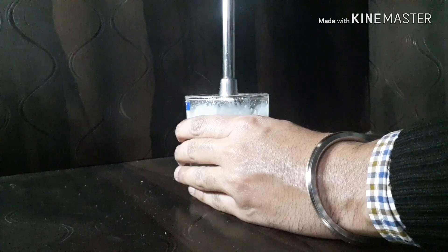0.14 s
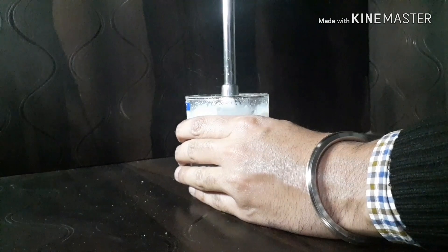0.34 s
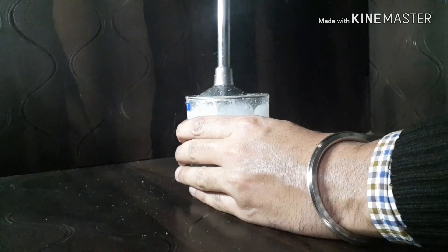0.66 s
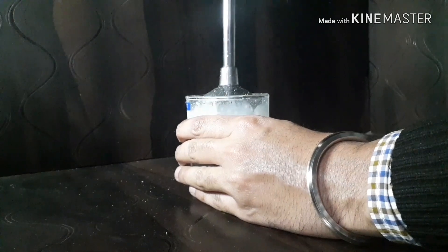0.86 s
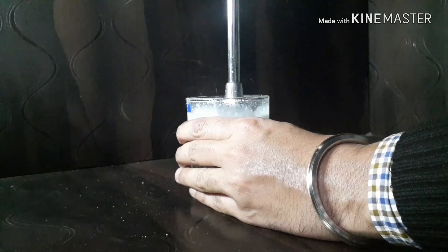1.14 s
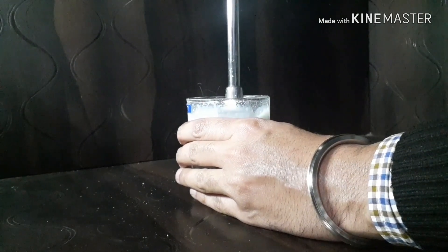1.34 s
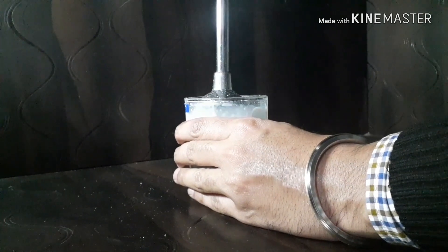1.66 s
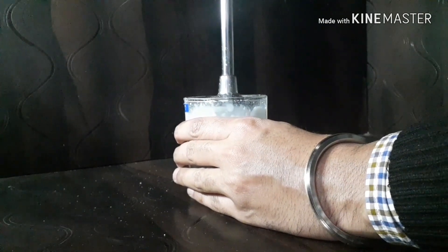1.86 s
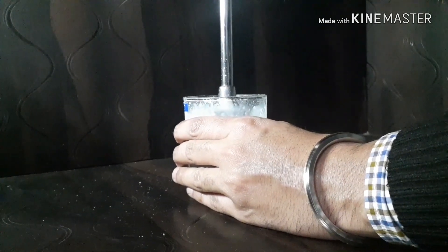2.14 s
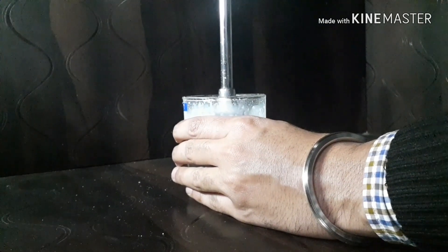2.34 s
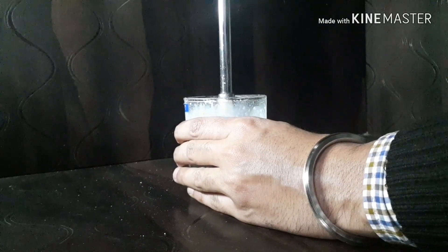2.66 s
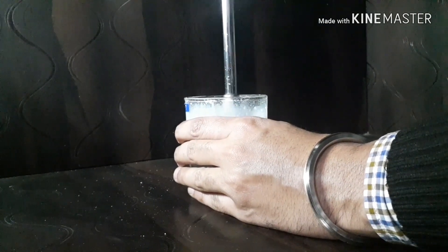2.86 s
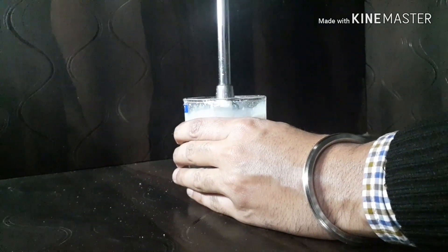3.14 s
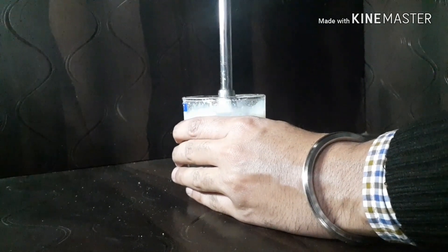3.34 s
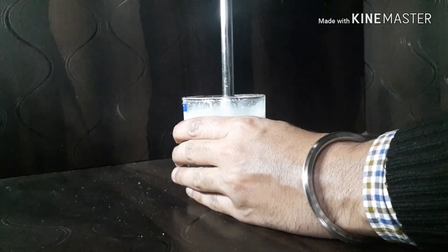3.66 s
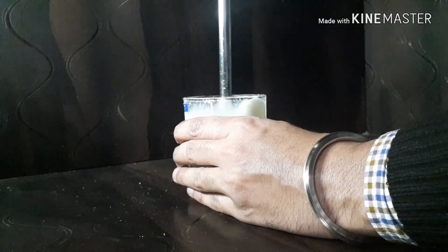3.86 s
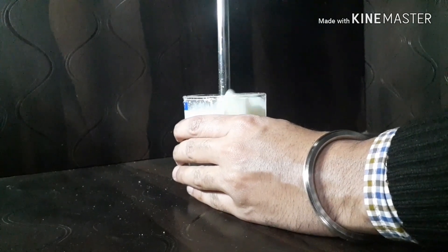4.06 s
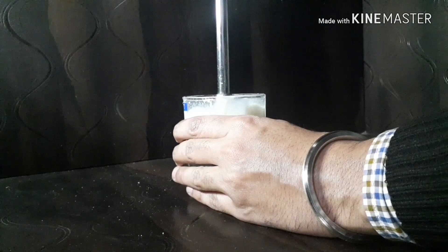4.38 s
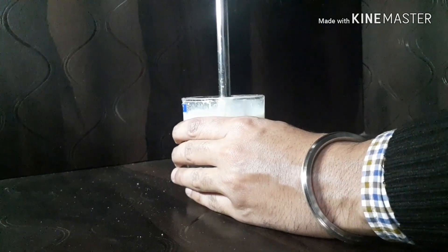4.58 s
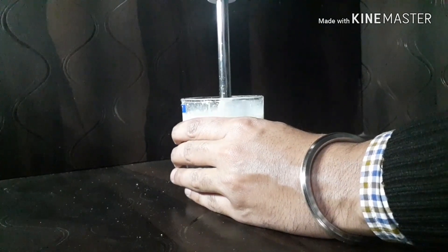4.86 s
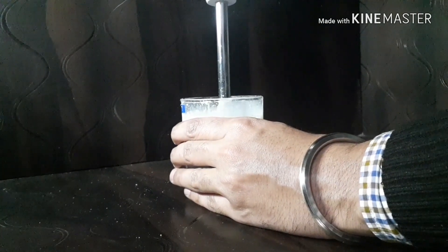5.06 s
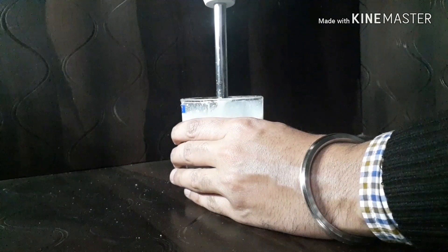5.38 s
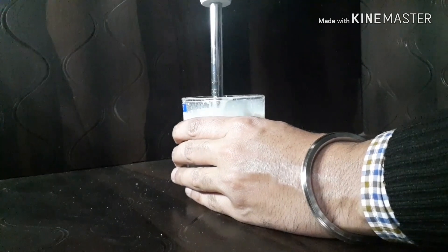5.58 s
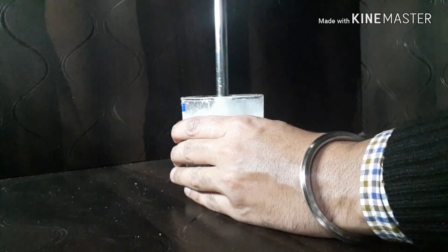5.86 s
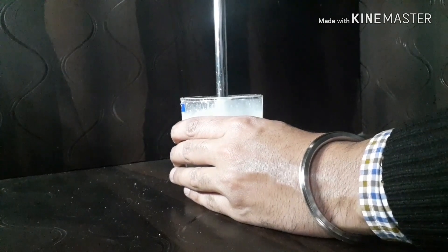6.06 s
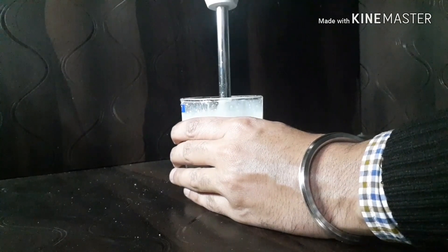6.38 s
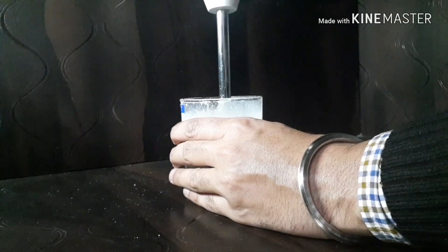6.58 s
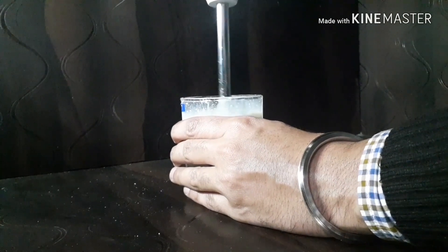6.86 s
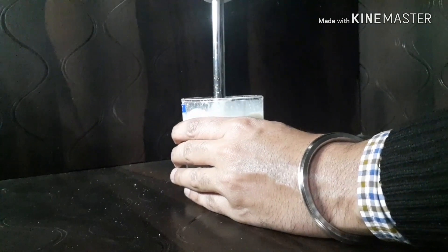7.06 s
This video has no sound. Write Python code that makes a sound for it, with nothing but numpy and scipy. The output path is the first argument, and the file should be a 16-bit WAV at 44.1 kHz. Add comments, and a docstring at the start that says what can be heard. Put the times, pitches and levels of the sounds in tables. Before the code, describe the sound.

Close in a small kitchen, an electric hand blender revs twice in a glass, each spin rising to a bright buzzing whine and sagging down within a second. Fine fizzy hiss runs underneath, and the metal foot clinks the glass. Four short plunges into liquid follow, with pauses between: low, lumpy churning, wet splash, table rattle and thin high whines. The hiss slowly fades; the last plunge is still running at the end.

```python
"""Hand blender in a glass

A hand blender works in a glass on a kitchen table. In two spins near the surface the motor runs fast and sings;
in four plunges into the liquid it labours, and the churning thumps through glass and table.
Tones that follow the shaft, short whines and filtered noise make the motor; uneven noise makes the churning.
A bright hiss, perhaps fizzing froth, never stops; the metal foot now and then knocks the glass (ringing tones)."""
import sys
import numpy as np
from scipy import signal
from scipy.fft import rfft, irfft, next_fast_len
from scipy.io import wavfile
from scipy.ndimage import uniform_filter1d, minimum_filter1d

SR = 44100
rng = np.random.default_rng(int(sys.argv[2]) if len(sys.argv) > 2 else 0)


def store_pcm(level_fs):
    """Save levels as 16-bit WAV."""
    pcm = np.round(np.clip(level_fs, -1, 1) * 32767).astype(np.int16)
    wavfile.write(sys.argv[1], SR, np.atleast_2d(pcm).T)


N = 318402  # length in samples

# Levels in colour, ring and shaft tables are relative: their sums are scaled later.

# Hiss over time: time_s, level_db, treble_change_db (for the part above about 10.5 kHz)
HISS_PATH = [(0.0, -28.5, -2), (0.14, -26, -1), (0.5, -25, 0.5), (0.8, -28, -4), (1.01, -25, 3.5),
             (1.37, -25.5, -3), (1.85, -30, -1), (2.83, -31.5, 3.5), (2.97, -26, 2), (3.2, -30.5, -4),
             (3.46, -34, 4), (3.65, -32, 7.5), (3.95, -32, -5), (4.22, -33, -1), (4.83, -35.5, -14),
             (5.27, -34, -7), (5.59, -32.5, -6), (5.87, -37.5, -10), (6.15, -38, -22), (6.4, -37.5, -12),
             (6.7, -39, -4), (7.22, -49, -8)]
# Colour of the hiss: pitch_hz, level_db (per Hz)
HISS_COLOUR = [(24, -79), (40, -32), (215, -11.5), (269, -15), (529, -22), (570, -14.5), (810, -5),
               (896, 1), (1040, -1), (2630, -5), (3740, 1.5), (6170, 3.5), (10400, 2), (14800, -8),
               (16000, 8)]
# Narrow bands that stand out of the hiss: pitch_hz, width_hz, level_db
HISS_BANDS = [(705, 107, -19.5), (5730, 130, -19.5), (7980, 210, -19.5)]
# Foot against glass: start_s, clink_db, knock_db, knock_pitch_hz, thud_db
KNOCKS = [(1.144, -7.5, -15, 3440, -24.5), (1.197, -9, -18, 5440, -41), (1.239, -10, -16, 5340, -28.5),
          (1.386, -5.5, -29, 2337, -27), (1.702, -34, -28, 955, -30), (2.796, -24, -10.5, 1000, -22),
          (2.89, -9, -26, 3270, -16), (3.999, -30, -18, 2030, -14), (4.063, -30, -16, 2030, -27),
          (4.167, -27, -12.5, 1913, -22), (4.294, -15, -28, 1660, -8.5), (4.308, -9, -14.5, 3930, -15),
          (5.708, -22, -4.5, 1200, -7), (6.29, -55, -27, 813, -29), (6.576, -28, -27, 905, -40),
          (6.924, -24, -8, 940, -27)]
# Ringing tones of the glass: pitch_hz, level_db, time_to_fall_60_db_s
GLASS_RINGS = [(2060, 3, 0.0062), (3220, -24, 0.014), (4370, -1.5, 0.014), (5420, -7, .02),
               (6000, -8.5, 0.027), (7200, -14, 0.011)]
# Ringing of glass and table: pitch_hz, width_hz, level_db
TABLE_RINGS = [(98.2, 5.2, -18.5), (142.3, 14, -12), (172.6, 14, -41), (233.3, 8.5, -13.5),
               (315.6, 10, -12), (347.5, 10, -8), (417.5, 11.5, -14.5), (594, 23, -16), (670, 7.4, -22),
               (888, 12, -17), (940, 40, -30), (1283, 29, -27)]
# Motor whine, one row a start: start_s, length_s, first_pitch_hz, final_pitch_hz (both before the sag),
# climb_s, peak_db, held_db (both before the fades), fuzz_0_to_1
WHINES = [(0.077, 0.084, 2850, 3600, .05, -29, -32, 0.6), (.965, 0.083, 2550, 3870, 0.058, -29.5, -28, 0.3),
          (2.829, 0.23, 3000, 3370, .04, -21, -31, 0.9), (3.805, 0.53, 2750, 3360, 0.024, -25, -37, 0.75),
          (5.256, 0.513, 2817, 3370, .05, -30.5, -36, 0), (6.647, .62, 2995, 3370, 0.051, -30, -37, 0.4)]
# Laden shaft heard through the churn, one table for each of three plunges:
# time_s, turns_hz, tone_db, octave_db
LADEN_SHAFT = [
    [(2.84, 155.3, -35, -38), (2.92, 166.1, -20.5, -36), (2.975, 177.6, -13.5, -21), (3.05, 168, -35, -16)],
    [(3.82, 155.9, -38, -29), (3.91, 178.3, -16.5, -23.5), (4.0, 179.7, -20, -14.5),
     (4.06, 171.6, -8.5, -26), (4.12, 168.8, -28, -19), (4.25, 172.3, -46, -13), (4.33, 157.9, -9, -34),
     (4.36, 153, -22, -34)],
    [(6.62, 139, -26, -39), (6.68, 153.6, -17, -21), (6.73, 163, -39, -19), (6.79, 165.4, -15, -26),
     (6.9, 165.8, -29, -16), (6.98, 164.4, -36, -28), (7.08, 166.7, -27, -11.5), (7.22, 165, -9, -26)],
]
# One table a plunge: time_s, churn_db, spray_db
PLUNGES = [
    [(2.765, -50, -44), (2.78, -25.5, -34), (2.82, -20.5, -29), (2.882, -18.5, -23.5), (2.93, -15.5, -24),
     (2.948, -22, -30), (2.97, -14.5, -16.5), (3.158, -35, -39.5), (3.3, -45.5, -51), (3.55, -61, -48)],
    [(3.74, -47, -47), (3.77, -24.5, -33.5), (4.05, -17.5, -28), (4.164, -18.5, -29), (4.252, -17.5, -31),
     (4.31, -14.5, -21), (4.335, -18.5, -26.5), (4.41, -26.5, -34.5), (4.46, -28, -34.5), (4.686, -45, -59),
     (4.95, -61, -48)],
    [(5.19, -47, -47), (5.208, -24, -37), (5.294, -19, -32.5), (5.428, -18.5, -30), (5.578, -11.5, -31),
     (5.594, -17, -29), (5.634, -7.5, -33), (5.695, -13, -28.5), (5.725, -6, -28), (5.775, -15.5, -39),
     (5.892, -35.5, -50), (6.2, -51, -56)],
    [(6.56, -55, -51), (6.582, -36.5, -43), (6.628, -25, -34), (6.672, -19.5, -32.5), (6.78, -18, -35),
     (6.822, -12, -32), (6.846, -18, -33), (6.89, -11, -33), (6.906, -23, -32), (6.928, -11, -35),
     (6.945, -20.5, -32), (6.99, -15, -31), (7.012, -10.5, -29), (7.22, -12.5, -30.5)],
]
# Liquid over the blade, one row a plunge: splash_offset_db (against churn, before a further 0.5 dB drop),
# splash_loss_db_per_octave (a negative loss brightens)
DEPTHS = [(-4, -3.5), (-5, -3.5), (-5.5, 2.5), (-2, 3.5)]
# Colour of the churn, the splash and the spray: pitch_hz, level_db (per Hz)
CHURN_COLOUR = [(18, -96), (30, -32), (85, -12), (167, 9.5), (204, 1.5), (338, 5.5), (425, 9.5),
                (485, -1.5), (580, 8), (630, -29), (695, -12), (1500, -58), (1950, -76), (3300, -120)]
SPLASH_COLOUR = [(410, -45), (700, -0.5), (775, -4.5), (1220, -7.5), (1400, -9.5), (1650, -14), (2470, -21),
                 (3200, -44), (4160, -58), (7040, -120)]
SPRAY_COLOUR = [(1470, -8), (2500, -12.5), (3280, -8), (4270, -15), (5870, -11.5), (7360, -22.5),
                (12900, -29.5), (16000, -29)]
# One table a spin: time_s, shaft_turns_hz, whirr_db
SPINS = [
    [(0.0, 110, -82), (0.05, 136.1, -32.5), (0.12, 163.8, -28.5), (0.2, 200.8, -28.5), (0.34, 216.6, -27.5),
     (0.54, 225.9, -26), (0.6, 220.8, -27), (0.712, 199, -27.5), (0.826, 154.3, -30.5), (0.93, 121.5, -43)],
    [(0.93, 121.2, -38), (0.965, 139.9, -29), (1.014, 164.5, -28.5), (1.1, 201.7, -26.5),
     (1.19, 219.4, -26.5), (1.396, 228.1, -24.5), (1.46, 219.6, -24.5), (1.544, 180.7, -29),
     (1.684, 113.5, -35), (1.85, 80.3, -44), (2.05, 55.9, -68)],
]
# Shaft tones: multiple_of_shaft_pitch, level_db, level_db of the line one mains throb higher in pitch
SHAFT_TONES = [(1, 0, -17.5), (2, 1.5, -52), (3, 3, -13), (4, -5.5, -22), (5, -1.5, -3.5), (6, -2.5, -26),
               (7, -10, -15), (8, -2, -8), (9, -1.5, -9), (10, -1.5, -0.5), (15, -3.5, -10)]
# Colour of the whirr and of the brush hiss: pitch_hz, level_db (per Hz)
WHIRR_COLOUR = [(35, -64), (60, 4), (162, -10), (219, -26), (278, -6), (422, 8.5), (668, 5), (815, 5),
                (1400, 8), (2490, 6.5), (7000, -20), (9100, -46), (15400, -120)]
BRUSH_COLOUR = [(1470, -14), (2500, -49), (2740, 11.5), (3800, 10), (6010, 10), (7300, -2), (14900, 3.5),
                (16000, -21)]
# Ringing of the motor housing: pitch_hz, width_hz, level_db
HOUSING_RINGS = [(1373, 144, -0.5), (1486, 120, -8.5), (2173, 16, -16.5), (5970, 470, -8)]

MAINS_THROB_HZ = 100  # twice the mains frequency
TOP_EDGE_HZ = 15490  # nearly nothing is left far above this pitch
WHINE_RISE_S, SETTLE_S, WHINE_FALL_S = 0.037, 0.047, 0.054
SAG_HZ, SAG_S = 151, 0.0798  # the pitch sags at the end of each whine
FOURTH_DB = -5  # fourth multiple against the mean of tone and octave
SPLASH_SWING = 0.97  # dB of splash for each dB of churn, about a churn of -20 dB
FULL_HZ = 222  # shaft turns per second at full speed
TONE_DB, TONE_DB_PER_OCTAVE = -11.5, 11  # shaft tone against whirr at full speed, and its loss as it slows
BRUSH_DB, BRUSH_DB_PER_OCTAVE = -2, 5  # likewise for the brush hiss


def gain_of(db):
    """Turns decibels into a multiplier."""
    return 10 ** (np.asarray(db) / 20)


def evened(x):
    """Scales a sound to an average (rms) level of 1."""
    return x / np.sqrt(np.mean(x ** 2) + 1e-20)


def add(mix, s, sound):
    """Adds a sound to the mix from time s on, cut off at the end of the mix."""
    part = mix[round(s * SR):][:len(sound)]
    part += sound[:len(part)]


def spread(rows):
    """Gives the start time, and each column joined by straight lines at the sample rate."""
    s, *columns = np.transpose(rows)
    t = np.arange(s[0], s[-1], 1 / SR)
    return s[0], [np.interp(t, s, c) for c in columns]


def coloured(x, points):
    """Filters by a curve of (Hz, dB) points, close to silent outside it; rms 1."""
    f, db = np.transpose(points)
    size = next_fast_len(len(x))
    hz = np.fft.rfftfreq(size, 1 / SR)
    curve_db = np.interp(np.log(hz + 1), np.log(f + 1), db, left=-90, right=-90)
    return evened(irfft(rfft(x, size) * gain_of(curve_db), size)[:len(x)])


def resonate(x, hz, width):
    """Rings at a pitch that may move: shifts it down to zero, smooths, and shifts back."""
    turn = np.exp(2j * np.pi * np.cumsum(hz * np.ones(len(x))) / SR)
    r = np.exp(-np.pi * width / SR)
    return 2 * (turn * signal.lfilter([1 - r], [1, -r], x / turn)).real


def ringing(x, rings):
    """Sums the rings that a sound wakes in a body, each at its own level."""
    return sum(gain_of(db) * evened(resonate(x, f, w)) for f, w, db in rings)


def wander(count, ms):
    """Smooth chance of rms 1 that changes over about ms milliseconds."""
    size = max(int(ms * SR / 1000), 2)
    return evened(uniform_filter1d(uniform_filter1d(rng.standard_normal(count), size), size))


def throb(count, depth):
    """The torque pulses twice per mains cycle."""
    return 1 + depth * np.cos(2 * np.pi * MAINS_THROB_HZ * np.arange(count) / SR)


def kitchen(x, t60=0.57):
    """The room answers with a diffuse tail: sparse echoes of random sign, falling 60 dB in t60 seconds."""
    t = np.arange(SR) / SR
    signs = rng.choice([-1., 1.], SR)
    present = (rng.random(SR) < 2000 / SR) * (t > .006)  # about 2000 echoes a second after a short gap
    taps = signs * present * gain_of(-60 * t / t60)
    return signal.fftconvolve(x, taps / np.linalg.norm(taps))[:N]


def hiss():
    """Fine noise that fades unevenly, its top end dulling, brightening and flickering."""
    s, (db, treble_db) = spread(HISS_PATH)
    noise = rng.standard_normal(len(db))
    x = evened(coloured(noise, HISS_COLOUR) + ringing(noise, HISS_BANDS))
    treble = signal.sosfiltfilt(signal.butter(2, 10500, "high", fs=SR, output="sos"), x)
    flicker_db = 0.76 * wander(len(x), 40)
    return s, gain_of(db) * (x + (gain_of(treble_db + flicker_db) - 1) * treble)


def knock(s, clink_db, knock_db, hz, thud_db):
    """A clink of the glass, a short knock at the struck spot and a thud in the table."""
    t = np.arange(6000) / SR
    clink = sum(gain_of(db - 60 * t / t60) * np.sin(2 * np.pi * (f * t + rng.random()))
                for f, db, t60 in GLASS_RINGS)
    spot = gain_of(-60 * t / .03) * np.sin(2 * np.pi * hz * t)
    # high table rings die first
    thud = sum(gain_of(db - 60 * t / (12 / f + .03)) * np.sin(2 * np.pi * f * t) for f, w, db in TABLE_RINGS)
    thud *= 1 - np.exp(-t / 0.0036)  # the push rises softly
    clink, thud = clink / abs(clink).max(), thud / abs(thud).max()
    return s, gain_of(clink_db) * clink + gain_of(knock_db) * spot + gain_of(thud_db) * thud


def whine(row):
    """A narrow tone that climbs fast, levels off and settles, blurred by fuzz and chopped by the mains."""
    s, length, first_hz, final_hz, climb_s, peak_db, held_db, fuzz = row
    t = np.arange(0, length, 1 / SR)
    n, fuzz = len(t), np.clip(fuzz, 0, 1)
    climb = (first_hz - final_hz) * np.exp(-t / climb_s)
    hz = final_hz + climb - SAG_HZ * np.exp((t - length) / SAG_S)
    settling = np.exp(-np.maximum(t - WHINE_RISE_S, 0) / SETTLE_S)
    db = held_db + (peak_db - held_db) * settling + 1.1 * wander(n, 25)
    edges = np.minimum(t / WHINE_RISE_S, 1) ** 2 * np.minimum((length - t) / WHINE_FALL_S, 1)
    tone = np.sqrt(2) * np.cos(2 * np.pi * np.cumsum(hz * (1 + 0.0063 * wander(n, 2.5))) / SR)
    noise = evened(resonate(resonate(rng.standard_normal(n), hz, 330), hz, 330))
    blend = np.sqrt(1 - fuzz ** 2) * tone + fuzz * noise
    return s, edges * gain_of(db) * blend * throb(n, .7)


def laden(rows):
    """The slowed shaft hums, its tone, octave and fourth multiple wavering by chance."""
    s, (hz, tone_db, octave_db) = spread(rows)
    n = len(hz)
    levels_db = (tone_db, octave_db, (tone_db + octave_db) / 2 + FOURTH_DB)
    turns = np.cumsum(hz * (1 + .008 * wander(n, 15))) / SR
    hum = sum(gain_of(db + 2 * wander(n, 15)) * np.cos(2 * np.pi * k * turns)
              for k, db in zip((1, 2, 4), levels_db))
    return s, hum * signal.windows.tukey(n, .15)  # fades in and out


def plunge(rows, offset_db, loss_db):
    """Lumps of liquid slap blade and glass unevenly; the table rings with them; splash and spray share them."""
    s, (churn_db, spray_db) = spread(rows)
    splash_db = offset_db - 20.5 + SPLASH_SWING * (churn_db + 20)
    n = len(churn_db)
    lumps_db = 1.5 * wander(n, 14) + 1.2 * wander(n, 3)
    slaps = rng.standard_normal(n) * gain_of(lumps_db) * throb(n, 0.061)
    churn = evened(coloured(slaps, CHURN_COLOUR) + ringing(slaps, TABLE_RINGS))
    # the tilt turns about 1 kHz
    tilted = [(f, db - loss_db * np.log2(f / 1000)) for f, db in SPLASH_COLOUR]
    splash = coloured(rng.standard_normal(n) * gain_of(0.57 * lumps_db), tilted)
    spray = coloured(rng.standard_normal(n) * gain_of(0.79 * lumps_db), SPRAY_COLOUR)
    return s, gain_of(churn_db) * churn + gain_of(splash_db) * splash + gain_of(spray_db) * spray


def shaft_tone(hz, turns):
    """Multiples of the shaft pitch, each with a line one mains throb above and below it."""
    n = len(hz)
    mains = MAINS_THROB_HZ * np.arange(n) / SR
    lines = [(k * turns, db) for k, db, _ in SHAFT_TONES]
    lines += [(k * turns + mains, db) for k, _, db in SHAFT_TONES]
    lines += [(k * turns - mains, db - 7.0) for k, _, db in SHAFT_TONES]
    tone = sum(gain_of(db + 3.04 * wander(n, 17.4)) * np.cos(2 * np.pi * (cycles + rng.random()))
               for cycles, db in lines)
    # multiples surge as they cross the first two housing rings
    return tone + sum(resonate(tone, f, w) for f, w, _ in HOUSING_RINGS[:2])


def spin(rows):
    """The shaft sings, a rattling whirr rings in the housing and the brushes hiss."""
    s, (hz, whirr_db) = spread(rows)
    n, octaves = len(hz), np.log2(hz / FULL_HZ)
    tone_db = whirr_db + TONE_DB + TONE_DB_PER_OCTAVE * octaves
    brush_db = BRUSH_DB + BRUSH_DB_PER_OCTAVE * octaves  # against the whirr
    turns = np.cumsum(hz * (1 + 0.0027 * wander(n, 15))) / SR
    tone = shaft_tone(hz, turns)
    rattle = rng.standard_normal(n) * gain_of(0.56 * wander(n, 11)) * throb(n, 0.054)
    rattle *= 1 + 0.13 * np.cos(2 * np.pi * turns)  # swells once a turn
    whirr = coloured(rattle, WHIRR_COLOUR)
    for f, w, db in HOUSING_RINGS:
        whirr += gain_of(db) * evened(resonate(resonate(rattle, f, 3 * w), f, w))
    brush = coloured(rng.standard_normal(n) * throb(n, 0.075), BRUSH_COLOUR)
    motor_noise = evened(whirr) + gain_of(brush_db) * brush
    return s, np.sqrt(2) * gain_of(tone_db) * tone + gain_of(whirr_db) * motor_noise


def scene():
    """Sums the fizz, the blender and its knocks, and the room's answer to all but the fizz."""
    blender, fizz = np.zeros(N), np.zeros(N)
    add(fizz, *hiss())
    for row in KNOCKS:
        add(blender, *knock(*row))
    for source, tables in ((whine, WHINES), (laden, LADEN_SHAFT), (spin, SPINS)):
        for rows in tables:
            add(blender, *source(rows))
    for rows, depth in zip(PLUNGES, DEPTHS):
        add(blender, *plunge(rows, *depth))
    mono = blender + gain_of(-8) * kitchen(blender) + fizz
    return np.array([mono, mono])


def record(dry):
    """One microphone on both channels, deaf to deep bass, with a faint rumble; a peak limiter; a treble limit."""
    thin = signal.sosfilt(signal.butter(8, 92, "high", fs=SR, output="sos"), dry)
    rumble = coloured(rng.standard_normal(N), [(15, -8), (60, -2), (100, 0), (150, -12)])
    thin = thin + gain_of(-80) * rumble
    safe_gain = np.minimum(1, .95 / (abs(thin) + 1e-9))
    # the gain falls just ahead of a peak
    held = uniform_filter1d(minimum_filter1d(safe_gain, size=301), size=301)
    treble_limit = signal.firwin(1023, TOP_EDGE_HZ, window=("kaiser", 10), fs=SR)
    return signal.oaconvolve(thin * held, treble_limit[None], "same")


dry = scene()
out = record(dry)
store_pcm(out)
```